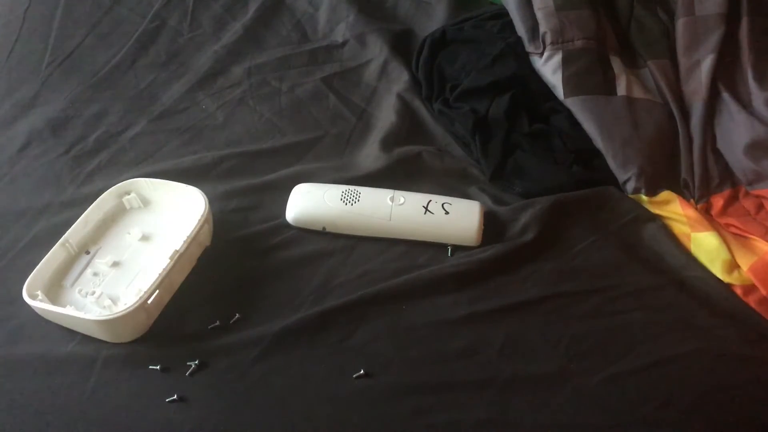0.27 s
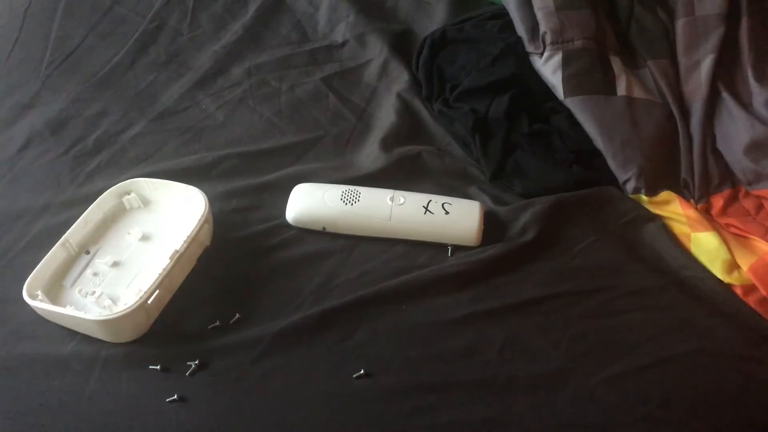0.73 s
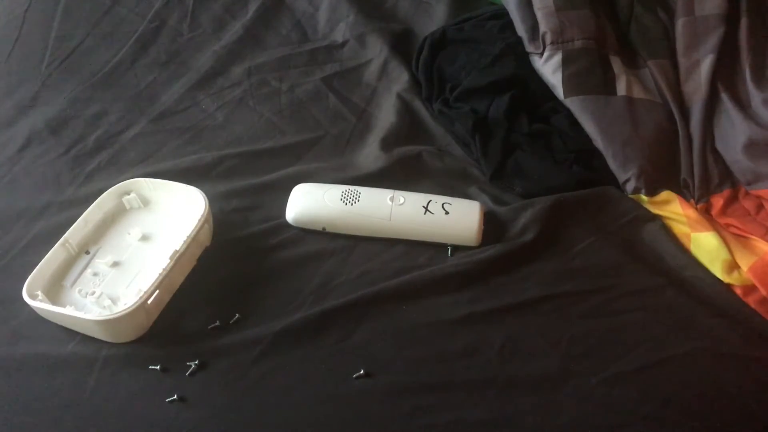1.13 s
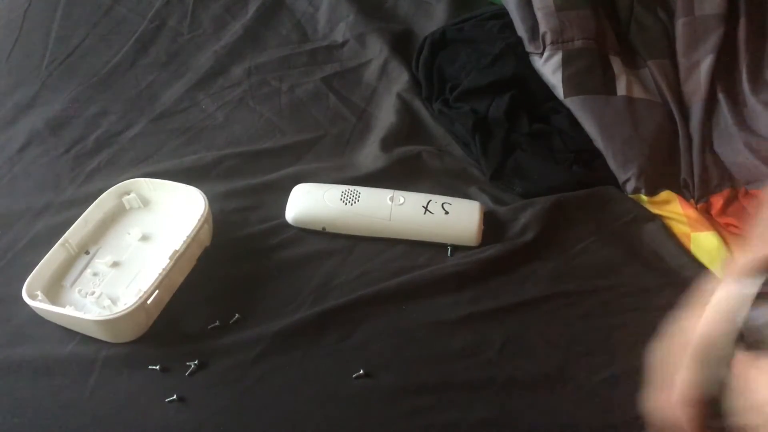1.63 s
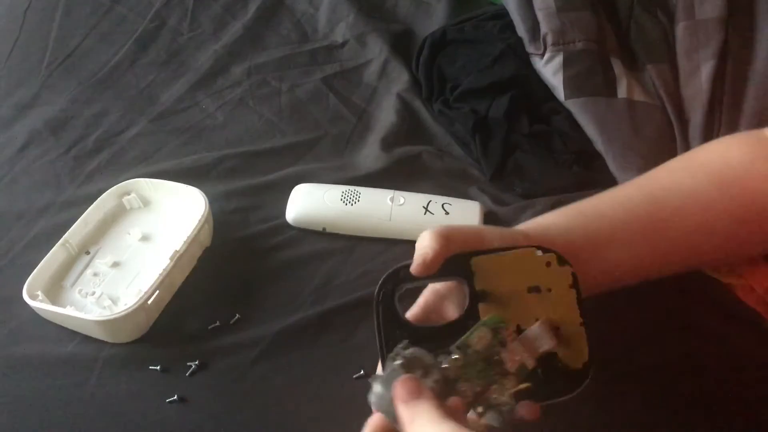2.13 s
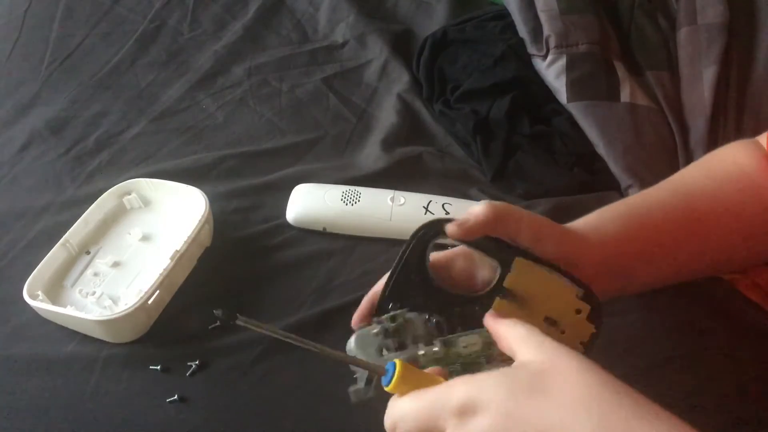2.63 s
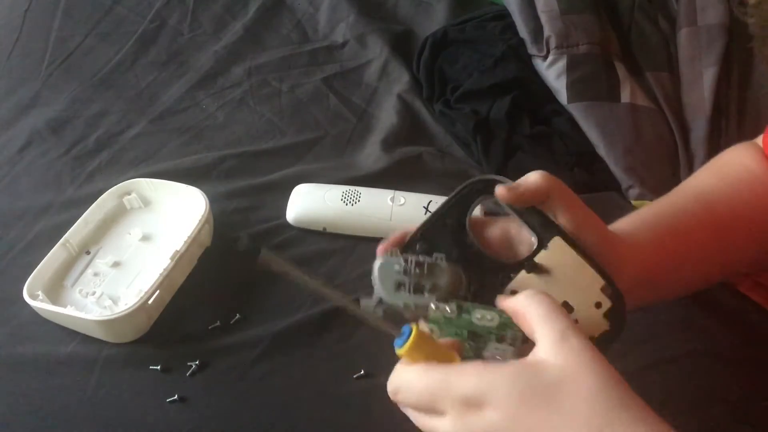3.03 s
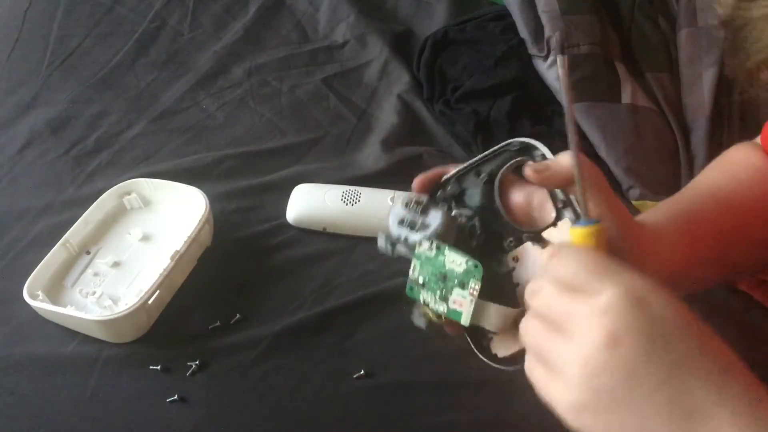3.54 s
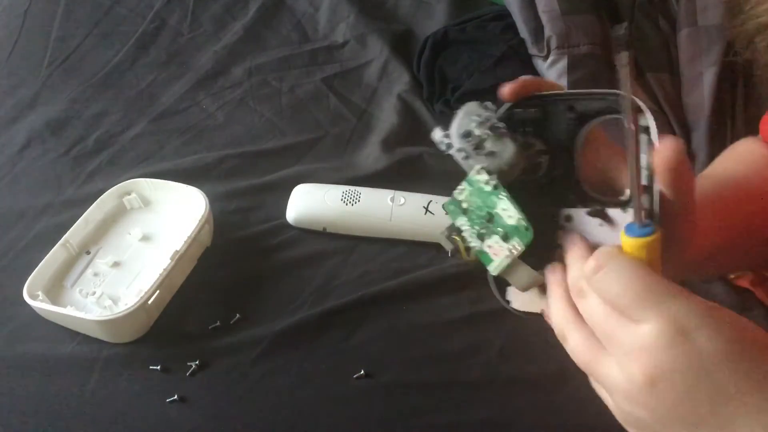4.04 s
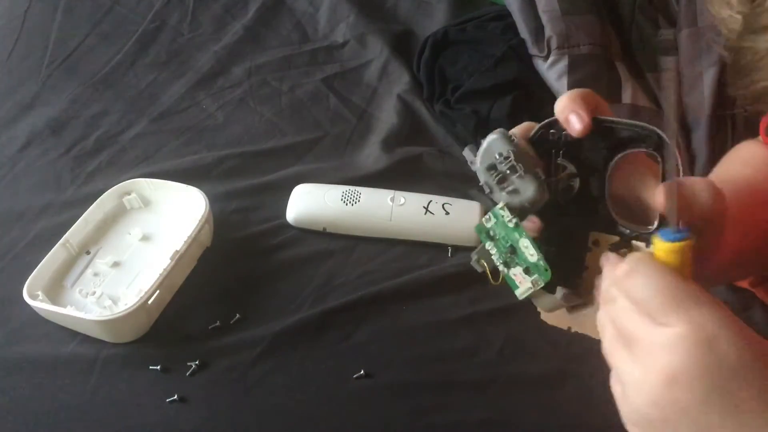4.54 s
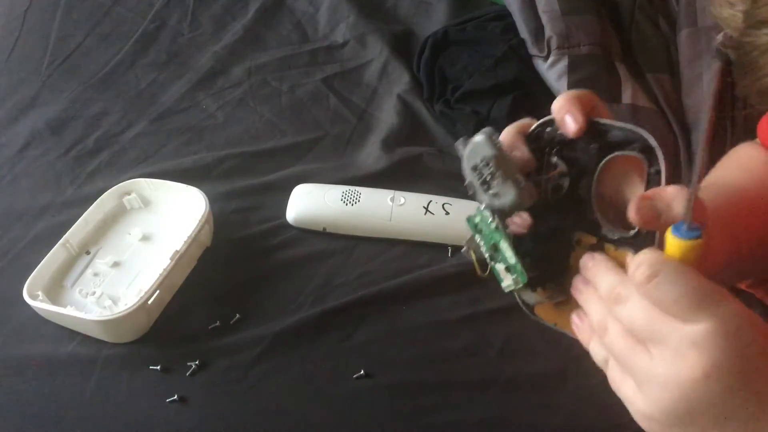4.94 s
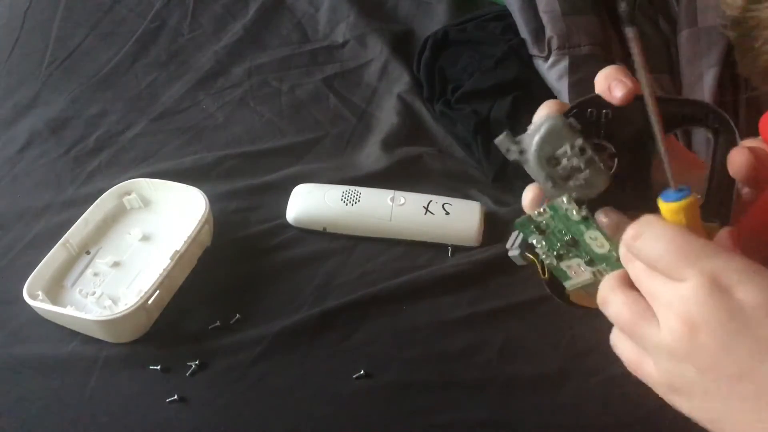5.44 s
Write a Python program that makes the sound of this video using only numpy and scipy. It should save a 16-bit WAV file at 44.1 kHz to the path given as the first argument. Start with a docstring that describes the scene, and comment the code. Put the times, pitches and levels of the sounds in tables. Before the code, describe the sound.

Plastic casing parts clack, tap and scrape in busy bursts, then thin out to light handling ticks over a very faint low hum.

```python
"""In a small furnished room, hands turn and pry at an opened plastic telephone base over a bed.
The dangling circuit board, keypad and a screwdriver tap the shell: impacts excite its damped modes.
Fingers rub it, heard as clumped slips in the same modes; a grainy late tail follows the taps; sleeves
brush cloth, heard as shaped noise. A faint motor hum of two wavering tones and the room's hush lie underneath."""
import sys
import numpy as np
from scipy import signal
from scipy.fft import rfft, irfft
from scipy.io import wavfile

SR = 44100
rng = np.random.default_rng(int(sys.argv[2]) if len(sys.argv) > 2 else 0)


def int16_out(signal):
    """Quantize to a 16-bit WAV file."""
    q = np.round(np.clip(np.atleast_2d(signal).T, -1, 1) * 32767)
    wavfile.write(sys.argv[1], SR, q.astype(np.int16))


N = 250929   # length in samples

# Room hush spectrum. Each row: frequency in Hz, relative spectral density in dB.
HUSH_SPECTRUM = [(25, -40.5), (50, -10), (75, -6.5), (120, -9.5), (200, -8.5), (320, -14.5), (470, -21),
                 (680, -17.5), (1000, -26.5), (2000, -30.5), (4000, -38), (8000, -42), (15500, -48.5),
                 (16000, -62)]
HUSH_DB = -68   # rms
# Motor tones. Each row: frequency in Hz, rms level in dB about which the tone wavers.
HUM_TONES = [(90, -64.5), (177, -86.5)]
# Reverberation time of the room. Each row: frequency in Hz, time to fall 60 dB in seconds.
ROOM_DECAY = [(300, 0.25), (800, 0.39), (2100, .3), (5500, 0.19), (12000, 0.034)]
# Starting strength of the reverberation. Each row: frequency in Hz, relative level in dB.
ROOM_BALANCE = [(200, 0.5), (1500, -9.5), (5000, -1), (12000, 9.5)]
# Reflections from near walls and bed. Each row: delay in seconds, level in dB.
NEAR_ECHOES = [(.004, -14), (.008, -15), (.016, -23)]
ROOM_DB = -10.5   # total energy of the diffuse reverberation

# Cloth friction spectrum. Each row: frequency in Hz, relative spectral density in dB.
CLOTH_SPECTRUM = [(300, -14), (600, -6.5), (900, -6.5), (1300, -8.5), (2500, -24), (6000, -40.5)]
# Sleeve strokes on cloth. Each row: centre in seconds, length in seconds, level at the centre in dB.
SLEEVE_BRUSHES = [(0.11, 0.24, -64.5), (0.466, 0.59, -67), (0.835, 0.15, -64), (1.183, 0.16, -58.5),
                  (1.632, 0.18, -64.5), (1.908, 0.14, -62), (2.11, 0.56, -73.5), (2.63, 0.17, -73),
                  (3.185, 0.21, -82.5), (3.52, 0.2, -75), (4.244, 0.28, -84), (4.71, 0.21, -72),
                  (5.31, 0.19, -83)]
CLOTH_REST_DB = -82.5   # faint rustle between brushes

# Modes of the shell held in the hand. Each row: frequency in Hz, relative strength in dB,
# time to fall 60 dB after a tap in seconds.
SHELL_MODES = [(195, -12.5, .05), (379, -5.5, 0.026), (540, 5, 0.0071), (682, 11, 0.0076),
               (1150, -12, 0.033), (1260, 1, 0.017), (1419, 2, 0.019), (1570, 6, 0.013),
               (1840, 8.5, 0.0078), (1990, 0.5, 0.018), (2200, 2, 0.012), (2560, -0.5, 0.0039),
               (2757, 3, 0.0039), (3300, 6.5, 0.0035), (3850, 1, 0.0049), (4214, 3.5, 0.0039),
               (4612, -1, 0.0068), (4900, -3.5, 0.012), (5360, 2, 0.0067), (5830, -4, 0.01),
               (6270, -1.5, 0.0068), (6814, 0.5, .005), (7450, -3.5, 0.0043), (8650, -4, 0.0018),
               (9700, -8.5, 0.0032), (10670, -13, 0.0027), (11840, -16.5, .004), (13540, -13, 0.0025),
               (15100, -16, 0.0027)]
THUD_HZ, CLICK_HZ, CRACK_HZ = 900, 2900, 8000   # borders between thud, body, click and crack modes
# Radiation bands of the body, click and crack families in turn. Each row: lower edge in Hz, upper edge in Hz.
RADIATION_BANDS = [(1120, 2910), (3000, 7020), (8200, 14000)]

# How busily the fingers work on the shell. Each row: time in seconds, rub level in dB.
FINGER_WORK = [(0, -69), (.3, -72), (.45, -71.5), (.95, -65), (1.35, -71.5), (1.62, -73.5), (1.75, -68),
               (1.95, -77.5), (2.1, -76.5), (2.42, -70), (2.82, -83), (3.05, -71.5), (3.3, -84),
               (3.5, -69.5), (3.8, -81), (4.0, -80.5), (4.4, -80.5), (4.52, -67), (4.58, -76),
               (4.64, -63.5), (5.1, -78), (5.24, -73), (5.33, -73.5), (5.47, -71.5), (5.69, -90)]
RUB_CLICK_DB, RUB_CRACK_DB = -7, -22.5   # rub in click and crack modes re that in body modes
TICKS_PER_S, TICKS_DB = 150, -8   # typical rate of stray ticks; level re the rub

# Late tail after taps: gain in each band, then rise and 60 dB fall
TAIL_BODY_DB, TAIL_CLICK_DB, TAIL_CRACK_DB = -21, -13.5, -14
TAIL_RISE_S, TAIL_BODY_T60_S, TAIL_CLICK_T60_S = 0.024, 0.5, 0.38   # the crack falls as the click

# Taps on the shell. Each row: start in seconds, body level in dB, favoured body frequency in Hz,
# click re body in dB, favoured click frequency in Hz, thud re body in dB, contact length in ms.
# The levels are peak settings, to which the trims below are added.
SHELL_TAPS = [(.1023, -27, 1990, -20.5, 3840, -31, 10.1), (.1065, -35, 1980, -7.5, 4030, -6, 5.9),
              (.1275, -47, 2080, -1, 3900, -14, 3.3), (.1446, -53, 2080, -3, 3120, -36, 4.6),
              (.1539, -32, 1560, -14, 4660, -47, 5), (.1662, -26.5, 1980, -14, 5830, -20, 2),
              (.1953, -36.5, 1570, -16, 4100, -19, 4.4), (.2098, -51, 1530, -3, 4670, -6, 2),
              (.2399, -44.5, 1500, -13, 4400, -7, 2.4), (.2516, -53, 1550, -13, 4500, -28, 7.1),
              (.2665, -44, 1570, -29, 3400, -11, 1.7), (.281, -48, 1570, -16, 4060, -29, 8.2),
              (.2887, -43, 1570, -15, 4700, -27, 1.2), (.2945, -46, 1610, -8, 4660, -12, 2.2),
              (.3013, -41, 1600, -23, 3470, -21, 3.1), (.3096, -41.5, 1570, -16.5, 4080, -25, 5.5),
              (.317, -51, 1560, -11, 3830, -5, 6.5), (.372, -50, 1980, -7.5, 3440, -10, 17),
              (.4018, -53, 1580, -11, 4000, -7, 9.4), (.4852, -47.5, 1800, -26, 3000, -7, 6.5),
              (.628, -57, 2210, 10.5, 6350, 1, 3), (.6392, -42.5, 2200, -17, 2900, -23, 6.1),
              (.6454, -40, 1540, -8.5, 3160, -18, 5.9), (.6613, -47.5, 1210, -10.5, 3900, -4.5, 17),
              (.6926, -51, 1410, -17, 4700, -4.5, 21), (.7342, -48, 1830, -18, 3300, -14, 7),
              (.7952, -21.5, 2100, -2.5, 3720, -20.5, 3.5), (.7976, -40, 1330, 8, 6800, -2, 6.9),
              (.8106, -33, 1570, -12, 6470, -10.5, 6), (.8212, -41, 1840, -26, 3860, -12.5, 18),
              (.9083, -39, 1450, -22, 4900, -28, 4.6), (.961, -52, 1210, -20, 6900, -16, 7),
              (.9936, -66, 1520, -21, 6700, -11, 3.2), (1.0324, -17, 2390, -11, 3200, -16, 4.2),
              (1.0366, -21, 1090, -3, 3940, -24.5, 5.3), (1.0438, -29, 1830, -4.5, 4900, -12, 15.4),
              (1.0754, -41, 1440, -10, 5500, -38, 8.5), (1.0973, -41, 1230, -1, 5600, -25, 6.4),
              (1.1089, -33.5, 1480, -14, 4500, -30, 1.5), (1.1301, -30, 1840, -1.5, 4900, -16, 5.7),
              (1.1502, -23, 2620, -10, 3260, -22, 8.5), (1.1591, -32, 1150, -18, 2900, -10, 9.2),
              (1.1724, -16.5, 1645, -41, 3300, -54, 1.6), (1.1827, -47.5, 2050, 7, 3570, -6, 2.6),
              (1.1921, -51, 1260, 6, 2900, -26, 6.5), (1.2296, -28, 1590, -12.5, 3300, -27, 3.45),
              (1.3099, -44.5, 1660, -13, 5760, -15, 1.2), (1.4107, -58, 1880, -3, 3630, -26, 3.3),
              (1.4273, -50.5, 1800, -13, 5800, -23, 5), (1.5036, -54.5, 1200, -13, 3700, -4, 3.5),
              (1.5333, -54, 1850, -3.5, 4830, -11, 9.3), (1.7098, -50, 2370, -3, 2940, -6.5, 7.3),
              (1.7142, -46.5, 2400, -3, 6300, -11, 15), (1.7389, -53.5, 1720, -2.5, 4900, -8, 19),
              (1.7803, -66, 2130, 4, 6040, -14, 4.4), (1.8172, -66, 2090, 0, 6400, -13, 7.6),
              (1.8549, -58, 1950, -7, 4600, -10, 6.4), (2.0695, -56, 1590, -8, 3080, -14, 9.9),
              (2.0918, -45, 1150, -3.5, 5560, -30, 8.5), (2.1349, -50, 1930, 1, 5750, -2, 4.6),
              (2.2091, -48.5, 1590, -7, 4500, -11, 4.9), (2.2947, -53.5, 1960, -1, 5800, -18, 2.7),
              (2.322, -65, 1900, -1, 4600, -15, 6.6), (2.3398, -51.5, 1200, -2.5, 4860, -22, 9.2),
              (2.3533, -51.5, 1260, -11, 6850, -21, 4.1), (2.4021, -57, 1860, 6, 5570, -15, 3.7),
              (2.4242, -54.5, 1880, -24, 4300, -13, 5.8), (2.5117, -57.5, 1250, -8.5, 5330, -25, 11),
              (2.5708, -60, 1260, 3.5, 4900, -4, 4.3), (2.62, -48.5, 1140, -11, 3040, -31, 13),
              (2.6277, -46, 1300, -5.5, 4730, -21, 0.75), (2.6409, -47.5, 1750, -4, 3920, -18, 6.4),
              (2.6825, -56.5, 1310, -2, 3300, -24, 4.9), (2.7114, -56, 1520, -16.5, 3630, -21.5, 8),
              (2.8223, -59, 1570, -1.5, 5200, -11, 9.4), (2.9213, -40, 1554, -21.5, 3830, -31, 2),
              (2.936, -44.5, 1260, -19, 5000, -16, 7.2), (2.9426, -39, 1730, -6, 5360, -17, 7),
              (2.9612, -47.5, 1890, -7, 5050, -34, 6.5), (2.9675, -46.5, 1260, -18, 3200, -14, 4.7),
              (2.9789, -51.5, 1560, -7, 3360, -18, 12), (3.09, -57.5, 1230, -2, 6230, -35, 11.6),
              (3.1949, -51.5, 1704, -10, 5570, -20, 9.7), (3.3637, -53, 1800, -8.5, 3400, -12.5, 5.7),
              (3.3994, -39, 1730, -5.5, 6200, -16.5, 9), (3.4158, -57, 1560, 5, 5960, -18, 8.4),
              (3.4264, -39, 2050, -1, 5200, -27, 4.4), (3.4381, -48, 1410, -7, 3900, -7.5, 15),
              (3.4557, -45.5, 1150, -2.5, 4780, -18, 6), (3.4778, -43, 1570, -10, 5200, -11, 3.3),
              (3.4881, -50.5, 1320, -4, 2930, -15, 7.1), (3.5557, -41.5, 1300, -17, 4940, -12, 1.4),
              (3.6556, -57.5, 1310, -17, 5000, -10, 5.6), (3.689, -56, 2100, -5, 4600, -8, 7.6),
              (3.716, -51, 1480, -6.5, 4060, -22, 6.4), (3.749, -36.5, 1380, -30, 2900, -20, 0.94),
              (3.773, -61, 1420, -2, 6070, -6, 10), (3.9123, -53, 1407, -27.5, 2910, -5.5, 4.4),
              (4.165, -64.5, 1414, -2.5, 5360, -18.5, 17), (4.2278, -52.5, 1410, -7, 4720, -18.5, 9.1),
              (4.242, -48.5, 1130, -7, 4340, -17, 3), (4.3247, -55.5, 1860, -5.5, 3970, -10, 8),
              (4.4584, -52.5, 1530, -5.5, 5390, -14, 7.7), (4.4654, -42.5, 1560, -4.5, 5470, -16, 2.9),
              (4.477, -55.5, 1230, -2, 4880, -6, 11.6), (4.5277, -50, 1840, -4.5, 4940, -10, 9.1),
              (4.6203, -56, 1140, -19, 5100, -13, 2.4), (4.6429, -50, 1160, -2, 5800, -21, 4.9),
              (4.6737, -23, 1330, -2.5, 5300, -16.5, 8.64), (4.677, -27, 2030, 1.5, 3300, -40, 5.5),
              (4.8801, -33, 2040, 1.5, 5960, -13, 2.63), (5.0173, -55.5, 2060, -6.5, 6260, 0.5, 3.5),
              (5.1423, -55.5, 1540, -24, 5200, -23, 3.5), (5.1594, -58, 2070, 1, 4780, -24, 5.9),
              (5.1754, -30.5, 2020, -9, 6100, -14.5, 4.3), (5.1937, -44.5, 1360, 5, 4600, -18, 6),
              (5.205, -55, 1180, -20, 4600, -15, 18), (5.2347, -50, 2200, -.5, 4600, -19, 2.4),
              (5.418, -59, 1970, -2, 6000, -5, 2.3), (5.4671, -55, 1720, -2.5, 3080, -12, 9.9)]
TAP_TRIM_DB, THUD_TRIM_DB, CLICK_TRIM_DB = 3.0, -2.0, 0.5
CRACK_DB, CRACK_DB_PER_MS, CRACK_SPREAD_DB = -21, 0.39, -0.5   # crack re click: more in long contacts, some chance
# weight of the opening impulse in click and crack modes, giving a softer treble onset; 1 in the others
TREBLE_ONSET = 0.5

# Faint ring of the loose circuit board and metal plate. Each row: frequency in Hz,
# gain re the tap in dB, time to fall 60 dB in seconds.
BOARD_MODES = [(1224, -61.5, 0.34), (1960, -63, 0.15), (2200, -54, 0.14), (3230, -55, 0.33),
               (4600, -53.5, 0.306), (5200, -60, 0.26), (6500, -63.5, .3)]

MIC_LOW_HZ, CUTOFF_HZ = 70.6, 16365   # bass corner; frequency where the treble is first 50 dB down


def from_db(db):
    """Level to amplitude: 20 dB is a factor of ten."""
    return 10 ** (np.asarray(db) / 20)


def rms_one(x):
    """Normalisation by mean power, to rms 1."""
    return x / np.sqrt(np.mean(x ** 2) + 1e-20)


def at_hz(points, hz):
    """Interpolation of a table along log frequency."""
    table_hz, values = np.transpose(points)
    return np.interp(np.log(np.maximum(hz, 1)), np.log(table_hz), values)


def coloured(spectrum):
    """Spectral shaping: white noise weighted frequency by frequency; rms 1."""
    white = rfft(rng.standard_normal(N))
    gain = from_db(at_hz(spectrum, np.fft.rfftfreq(N, 1 / SR)))
    return rms_one(irfft(white * gain, N))


def drift(rate):
    """Slow random fluctuation: noise through a double low-pass pole at a rate in Hz; rms 1."""
    r = np.exp(-2 * np.pi * rate / SR)
    noise = rng.standard_normal(N + SR)
    return rms_one(signal.lfilter([1], [1, -2 * r, r * r], noise)[SR:])   # the filter's first second is dropped


def filtered(x, order, edges_hz, kind):
    """Butterworth filtering: a maximally flat pass band."""
    return signal.sosfilt(signal.butter(order, edges_hz, kind, fs=SR, output="sos"), x)


def ring(clicks, hz, t60):
    """Damped resonance: a unit click sets a decaying sine of initial height 1 ringing."""
    r, w = from_db(-60 / (t60 * SR)), 2 * np.pi * hz / SR
    return signal.lfilter([0, np.sin(w)], [1, -2 * r * np.cos(w), r * r], clicks + 1e-18)


def hush():
    """Ambient noise: a steady random signal with mostly low-frequency power."""
    return from_db(HUSH_DB) * coloured(HUSH_SPECTRUM)


def hum():
    """Rotating source: a distant motor's tones share one wavering speed; each level wavers on its own."""
    turn = 2 * np.pi * np.cumsum(1 + .006 * drift(3.3)) / SR
    return sum(np.sqrt(2) * from_db(db + 1.5 * drift(5.1)) * np.sin(hz * turn) for hz, db in HUM_TONES)


def room(x):
    """Reverberation: a few near echoes and diffuse noise that dies band by band."""
    t = np.arange(SR // 2) / SR
    edges = 150 * 2 ** np.arange(0, 7.1, .5)   # half octaves
    diffuse = 0
    for low, high in zip(edges, edges[1:]):
        band = filtered(rng.standard_normal(len(t)), 2, [low, high], "band")
        hz = np.sqrt(low * high)
        diffuse = diffuse + band * from_db(at_hz(ROOM_BALANCE, hz) - 60 * t / at_hz(ROOM_DECAY, hz))
    response = diffuse * np.clip(t / .012, 0, 1)   # the diffuse field builds up over 12 ms
    response *= from_db(ROOM_DB) / np.sqrt(np.sum(response ** 2))
    for s, db in NEAR_ECHOES:
        response[round(s * SR)] += from_db(db)
    return signal.fftconvolve(x, response)[:N]


def cloth():
    """Fibre friction: soft noise swells and fades with each sleeve stroke."""
    t = np.arange(N) / SR
    level = from_db(CLOTH_REST_DB)
    for s, length_s, db in SLEEVE_BRUSHES:
        level = level + from_db(db) * np.exp(-8 * ((t - s) / length_s) ** 2)
    return level * from_db(0.5 * drift(25)) * coloured(CLOTH_SPECTRUM)


def rub(low_hz, high_hz, per_s):
    """Stick-slip friction: clumped small clicks are dealt at random to the shell's modes; rms 1."""
    sizes = from_db(2.8 * np.minimum(rng.exponential(1, N), 5)) * rng.choice([-1, 1], N)
    chance = per_s * from_db(2.5 * drift(30)) / SR
    slips = sizes * (rng.random(N) < chance)
    dealt = rng.integers(0, len(SHELL_MODES), N)
    total = 0
    for k, (hz, db, t60) in enumerate(SHELL_MODES):
        if low_hz <= hz < high_hz:
            total = total + from_db(db) * ring(slips * (dealt == k), hz, 2.0 * t60)   # rings longer than a tap
    return rms_one(total)


def late_tail(taps_part, t60):
    """Late reverberation: the level of a grainy diffuse tail follows the taps' power, swelling and dying away."""
    rise = np.exp(-1 / (TAIL_RISE_S * SR))
    fall = from_db(-120 / (t60 * SR))   # acts on power, so the level falls 60 dB in t60
    power = signal.lfilter([1 - fall], [1, -fall], taps_part ** 2 + 1e-18)
    power = signal.lfilter([1 - rise], [1, -rise], power)
    return np.sqrt(power)


def handling(hits):
    """Incoherent addition: the levels of finger friction and the taps' late tail add in power, band by band."""
    fingers = from_db(np.interp(np.arange(N) / SR, *np.transpose(FINGER_WORK)))
    low = filtered(hits, 4, CLICK_HZ, "low")
    high = filtered(hits, 4, CLICK_HZ, "high")
    top = filtered(hits, 4, CRACK_HZ, "high")
    body_tail = from_db(TAIL_BODY_DB) * late_tail(low, TAIL_BODY_T60_S)
    click_tail = from_db(TAIL_CLICK_DB) * late_tail(high, TAIL_CLICK_T60_S)
    crack_tail = from_db(TAIL_CRACK_DB) * late_tail(top, TAIL_CLICK_T60_S)
    # the same grains serve the rub and the tail
    grains = np.hypot(fingers, body_tail) * rub(THUD_HZ, CLICK_HZ, 6200)
    grains += np.hypot(fingers * from_db(RUB_CLICK_DB), click_tail) * rub(CLICK_HZ, CRACK_HZ, 12000)
    grains += np.hypot(fingers * from_db(RUB_CRACK_DB), crack_tail) * rub(CRACK_HZ, SR, 12000)
    ticks = fingers * from_db(TICKS_DB) * rub(THUD_HZ, SR, TICKS_PER_S)
    return grains + ticks


def board(hits):
    """Sympathetic resonance: the taps set the loose board and plate ringing faintly."""
    return sum(from_db(db) * ring(hits, hz, t60) for hz, db, t60 in BOARD_MODES)


def mode_rings(hz, t60, group):
    """Modal decay and radiation: each mode is a dying sine, and each family above the thud is band-limited."""
    t = np.arange(1500) / SR
    rings = np.sin(2 * np.pi * np.outer(hz, t)) * from_db(-60 * t / t60[:, None])
    rings *= 1 - np.exp(-np.outer(hz, t) / 0.63)   # the contact is soft: each mode swells for part of a cycle
    for g, edges_hz in enumerate(RADIATION_BANDS, start=1):   # the small shell sends out little beside these
        rings[group == g] = filtered(rings[group == g], 4, edges_hz, "band")
    return rings


def taps():
    """Impact excitation: an opening impulse and quick bounces favour the modes near each tap's own pitches."""
    hz, mode_db, t60 = np.transpose(SHELL_MODES)
    group = np.digitize(hz, [THUD_HZ, CLICK_HZ, CRACK_HZ])   # 0 thud, 1 body, 2 click, 3 crack
    rings = mode_rings(hz, t60, group)
    out = np.zeros(N + 3000)
    luck = rng.standard_normal((len(SHELL_TAPS), len(hz)))
    crack_luck = rng.standard_normal(len(SHELL_TAPS))
    bounce = rng.random((len(SHELL_TAPS), 5, 40))   # four rows of sizes, one of intervals
    for k, (s, body_db, body_hz, click_db, click_hz, thud_db, ms) in enumerate(SHELL_TAPS):
        crack_db = CRACK_DB + CRACK_DB_PER_MS * ms + CRACK_SPREAD_DB * crack_luck[k]
        late_ms = np.cumsum(bounce[k, 4]) * .8
        touching = np.clip(ms - 1.5 - late_ms, 0, 1)   # bounces cease shortly before the contact ends
        late = np.minimum(late_ms * SR / 1000, 1499).astype(int)
        near_body = -np.minimum(30 * abs(np.log2(hz / body_hz)), 13)   # dB, by distance in octaves
        near_click = -np.minimum(22 * abs(np.log2(hz / click_hz)), 5)
        favour_db = np.choose(group, [0, near_body, near_click, 0])
        strength = from_db(mode_db + favour_db + 3.3 * luck[k])
        after_ms = np.maximum(np.arange(2999) / SR * 1000 - 0.99 * ms, 0)
        pressed = from_db(-np.minimum(8 * after_ms, 14))   # the part comes to rest on the shell and damps it
        treble_db = click_db + CLICK_TRIM_DB
        at = round(s * SR)
        for g, part_db in enumerate([thud_db + THUD_TRIM_DB, 0, treble_db, treble_db + crack_db]):
            touch = np.zeros(1500)
            np.add.at(touch, late, touching * (bounce[k, g] - .5) * 1.85)   # each bounce lands a little elsewhere
            touch[0] += TREBLE_ONSET if g > 1 else 1
            part = signal.fftconvolve(touch, strength[group == g] @ rings[group == g])
            if g > 0:   # the thud is left undamped
                part = part * pressed
            gain = from_db(body_db + part_db + TAP_TRIM_DB)
            out[at:at + len(part)] += gain * part / abs(part).max()
    return out[:N]


def scene():
    """Superposition: taps with the board's ring and the room, over handling, cloth, hum and hush."""
    hits = taps()
    return (hits + board(hits) + room(hits) + handling(hits) + cloth() + hum() + hush())[None]


def record(dry):
    """Band limitation: the microphone drops the deep bass and the top is cut steeply."""
    mic = filtered(dry, 2, MIC_LOW_HZ, "high")
    return signal.sosfilt(signal.cheby2(14, 50, CUTOFF_HZ, fs=SR, output="sos"), mic)


dry = scene()
out = record(dry)
int16_out(out)
```